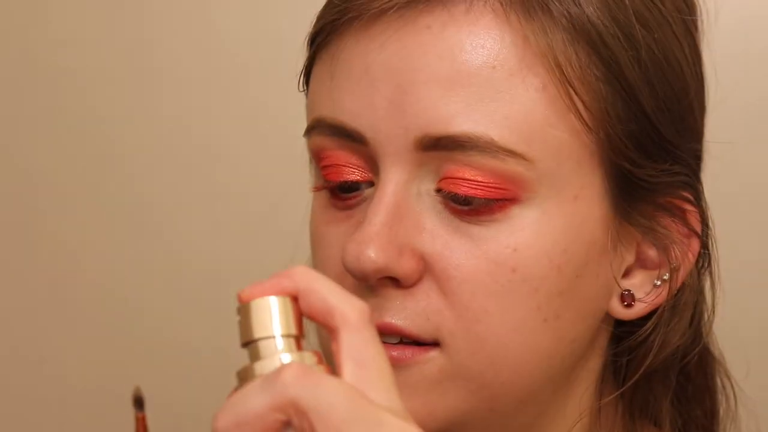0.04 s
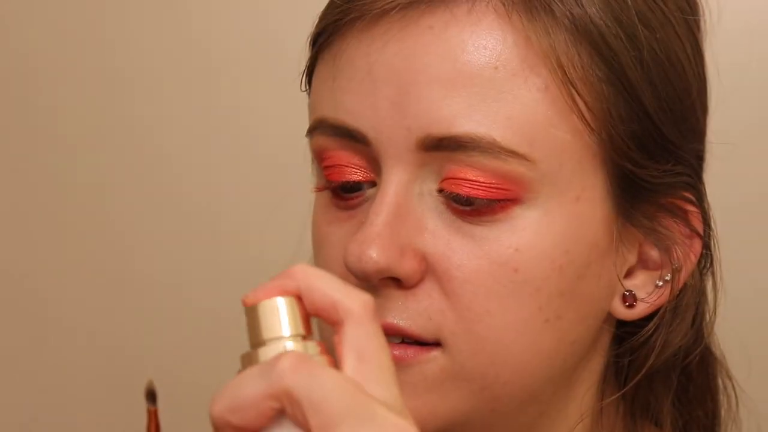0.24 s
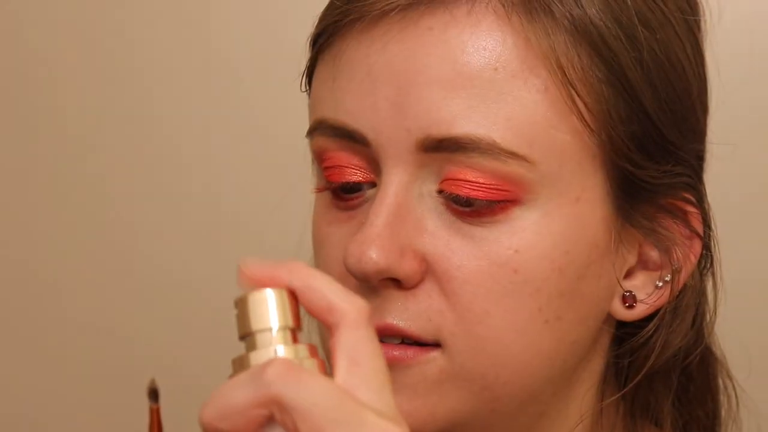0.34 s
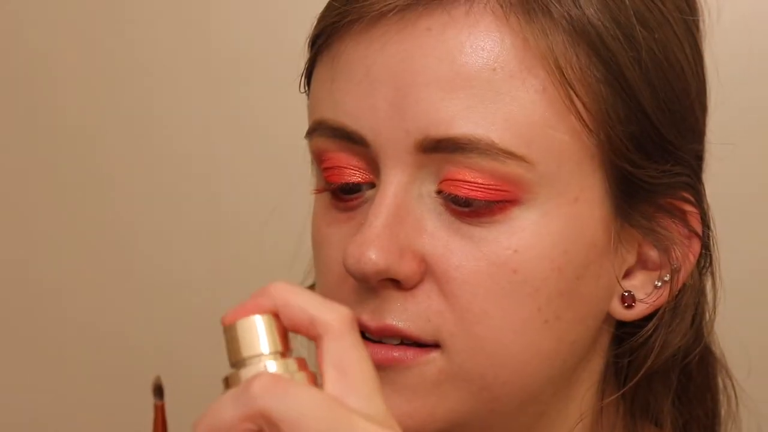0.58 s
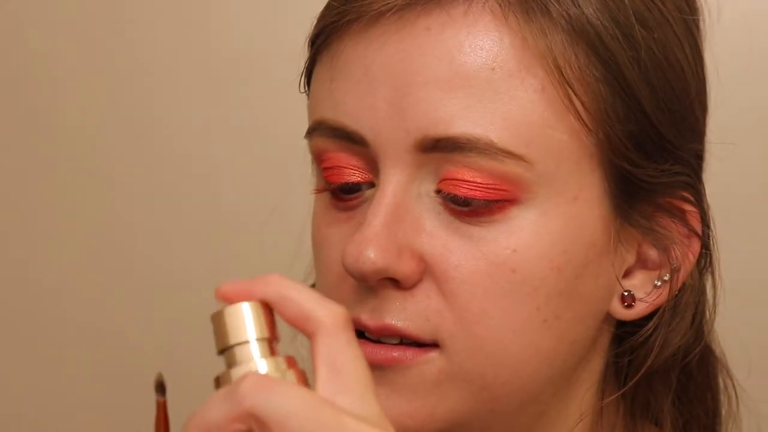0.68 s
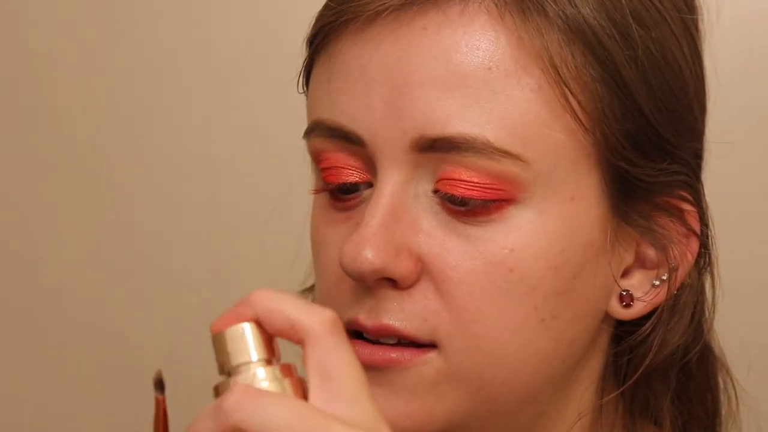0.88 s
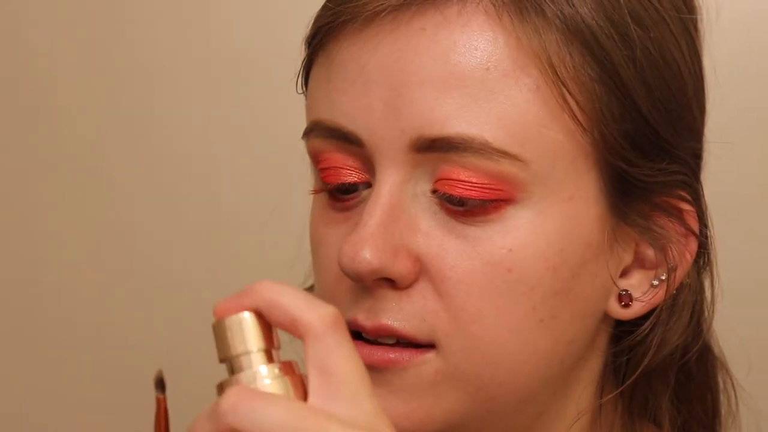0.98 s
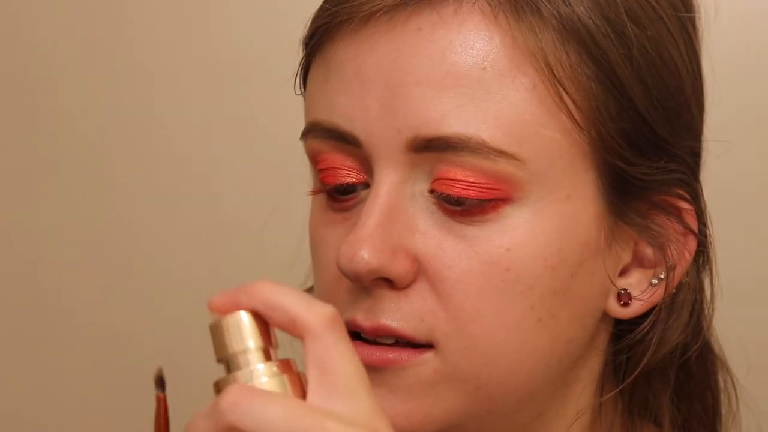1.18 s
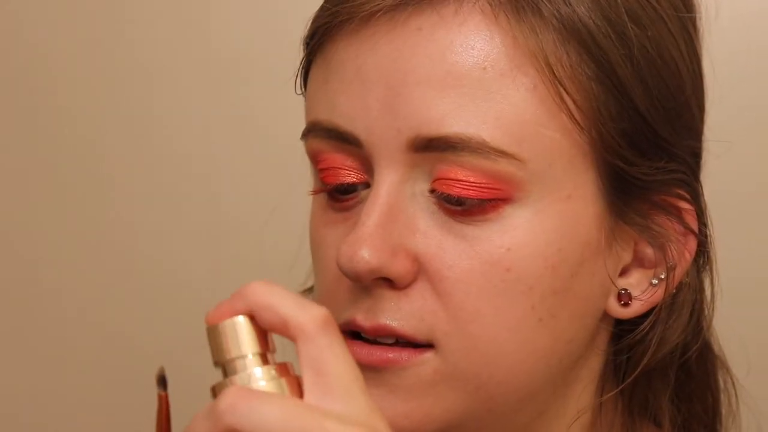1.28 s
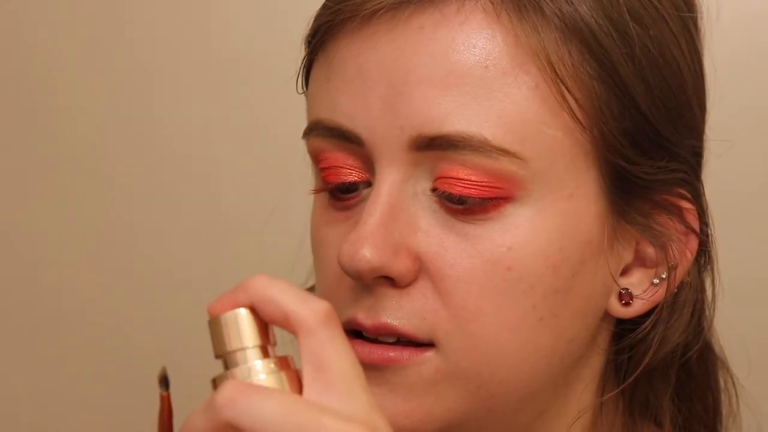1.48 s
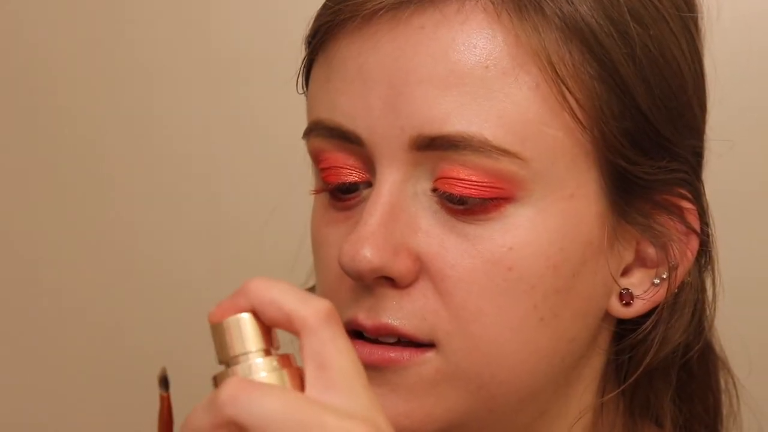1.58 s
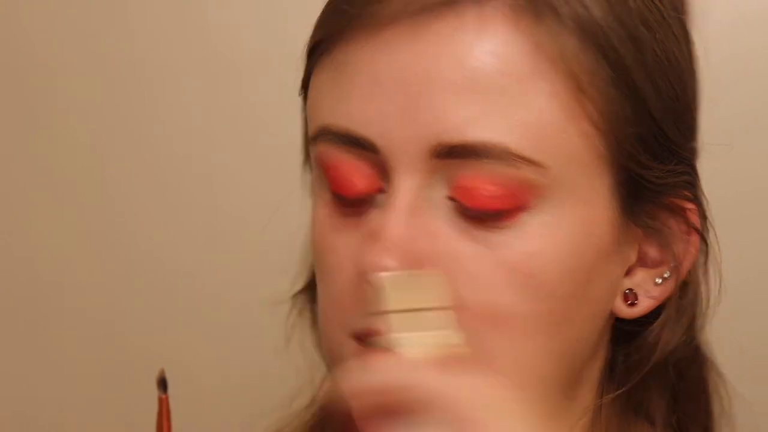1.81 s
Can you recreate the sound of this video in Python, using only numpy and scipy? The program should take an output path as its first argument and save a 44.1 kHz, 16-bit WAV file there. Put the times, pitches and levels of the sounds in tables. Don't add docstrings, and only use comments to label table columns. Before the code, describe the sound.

Six rapid pump-bottle spritzes with knocks and ticking releases, close in a small quiet room.

```python
import sys
import numpy as np
from scipy import signal
from scipy.fft import rfft, irfft
from scipy.io import wavfile

SR = 44100
rng = np.random.default_rng(int(sys.argv[2]) if len(sys.argv) > 2 else 0)


def decibels_to_gain(level_db):
    exponent = np.asarray(level_db, float) / 20
    return 10 ** exponent


def to_wav(s):
    ch = np.atleast_2d(s).T
    pcm = np.round(np.clip(ch, -1, 1) * 32767)
    wavfile.write(sys.argv[1], SR, pcm.astype(np.int16))


N = 81585


def level(x, db):
    return x * decibels_to_gain(db) / np.sqrt(np.mean(x ** 2))


def table(points, hz):
    p = np.array(points, float)
    return np.interp(np.log(np.maximum(hz, 1)), np.log(p[:, 0]), p[:, 1])


def shaped(x, gain):
    return irfft(rfft(x) * gain(np.fft.rfftfreq(len(x), 1 / SR)), len(x))


def noise(size, gain):
    return shaped(rng.standard_normal(size), gain)


def peak(hz, centre_hz, width_hz):
    return 1 / np.sqrt(1 + (2 * (hz - centre_hz) / width_hz) ** 2)


def walk(rate_hz, size):
    return level(noise(size, lambda hz: np.exp(-(hz / rate_hz) ** 2)), 0)


def decay(t, t60_s):
    return np.exp(-np.log(1000) * t / t60_s)


def lowpass(x, order, hz):
    return signal.sosfilt(signal.butter(order, hz, fs=SR, output="sos"), x)


def add(out, start_s, x):
    i = int(start_s * SR)
    out[i:i + len(x)] += x[:len(out) - i]


def gate(t, rise_s, hold_s, fall_s, sag_db_s):
    rise = np.clip(t / rise_s, 0, 1)
    fall = np.exp(-np.maximum(t - hold_s, 0) / fall_s)
    return rise * decibels_to_gain(sag_db_s * t) * fall


# pitch_hz, level_db (per Hz)
HISS = [(25, -40), (50, -7), (200, -10.5), (450, -13.5), (900, -20), (2000, -25.5), (5000, -32.5),
        (16000, -35)]
# pitch_hz, width_hz, level_db
HUM = [(121.7, 10, -52.5), (172.8, 18, -57.5), (255.5, 22.3, -65), (435, 22, -61.5)]


def background():
    t = np.arange(N) / SR
    hiss = level(noise(N, lambda hz: decibels_to_gain(table(HISS, hz)) * (hz > 30)), -50)
    hum = sum(level(noise(N, lambda hz: peak(hz, c, w) ** 2), db) for c, w, db in HUM)
    motor_hz = 44.5 + 1.62 * walk(1.75, N)
    motor = level(np.sin(2 * np.pi * np.cumsum(motor_hz) / SR), -54.5) * decibels_to_gain(1.05 * walk(8.2, N))
    linger = level(noise(N, lambda hz: peak(hz, 1450, 1300) ** 2), -60.5) * decay(t, 0.72)
    return hiss + motor + hum + linger


# pitch_hz, t60_s
ROOM_T60 = [(500, 0.25), (2000, 0.34), (6000, 0.37), (14000, 0.24)]


def room(x):
    size, level_db, gap_s = 16384, -8, 0.0034
    t, tail = np.arange(size) / SR, 0
    for hz in 250 * 2 ** np.arange(0, 6.1, .5):
        band = noise(size, lambda f: np.exp(-(np.log2(np.maximum(f, 1) / hz) * 3) ** 2))
        tail = tail + band * decay(t, table(ROOM_T60, hz))
    tail = tail * np.clip(t / gap_s - 1, 0, 1)
    tail = tail / np.sqrt(np.sum(tail ** 2))
    return decibels_to_gain(level_db) * signal.fftconvolve(x, tail)[:N]


def knock(modes, db, dark_db, rise_s, crack_db):
    size = 2048
    t = np.arange(size) / SR
    body = 0
    for hz, mode_db, t60_s in modes:
        vary_level, vary_pitch, phase = rng.standard_normal(3)
        gain = decibels_to_gain(mode_db - dark_db * np.log2(hz / 2000) + 0.27 * vary_level)
        tone = np.sin(2 * np.pi * (hz * (1 + 0.02 * vary_pitch) * t + phase))
        body = body + gain * tone * decay(t, t60_s)
    crack = lowpass(rng.standard_normal(size), 1, 7000) * np.exp(-t / 0.0024)
    x = (body / 2 + crack * decibels_to_gain(crack_db)) * (1 - np.exp(-(t / rise_s) ** 2))
    return signal.sosfilt(signal.butter(4, 610, "high", fs=SR, output="sos"), x) * decibels_to_gain(db + 13)


RATTLE_S = 0.00059


def drip(pump):
    t60_s = 0.013
    add(pump, 1.7135, knock([(2460, 0, t60_s), (3800, -5, t60_s)], -38.5, 0, RATTLE_S, -28))


# pitch_hz, width_hz, level_db
TUBE = [(996, 570, -16), (1746, 210, -15.5), (2160, 270, 0.5), (2480, 140, 0), (4230, 580, -10),
        (4900, 450, -10), (6700, 810, -15.5), (9300, 350, -13.5)]


def refill(hold_s, db):
    size = 4096
    t = np.arange(size) / SR
    liquid = 0
    for centre_hz, width_hz, band_db in TUBE:
        band = level(noise(size, lambda hz: peak(hz, centre_hz, width_hz) ** 2), 0)
        liquid = liquid + decibels_to_gain(band_db + 0.8 * walk(70, size)) * band
    air = noise(size, lambda hz: peak(hz, 3000, 3000) * hz ** 2 / (hz ** 2 + 800 ** 2))
    return level(liquid + level(air, -3.5), db) * gate(t, .0015, hold_s, 0.0071, sag_db_s=-63)


# pitch_hz, level_db, t60_s
STEM = [(981, -2.5, 0.021), (1764, -2, 0.016), (2207, -6, 0.016), (2643, -9, 0.026), (3640, -21, 0.054),
        (4240, -23.5, 0.041), (5800, -22, .02), (8960, -19.5, 0.0088), (10900, -44, 0.0057)]
# start_s, refill_length_s, refill_level_db, tick_level_db, darkness_db (per octave)
RELEASES = [
    (.5028, 0.19, -50.5, -31, -4.5),
    (0.7875, 0.042, -39.5, -27.5, -5),
    (1.0656, 0.036, -41.5, -28, -3.5),
    (1.314, 0.036, -40, -27, -3),
    (1.5488, 0.04, -42.5, -27.5, -0.3),
    (1.7604, 0.041, -53, -33.5, -3),
]


def releases(pump):
    for start_s, hold_s, db, tick_db, dark_db in RELEASES:
        x = refill(hold_s, db)
        add(x, 0, knock(STEM, tick_db, dark_db, rise_s=0.00019, crack_db=-11))
        if start_s == RELEASES[-1][0]:
            x = lowpass(x, 5, 3180)
        add(pump, start_s, x)


# pitch_hz, level_db
MIST = [(500, -35), (1100, -3), (2000, -2.5), (4000, -3), (5000, -8.5), (7000, -12), (12000, -17.5),
        (16000, -25.5)]
# pitch_hz, width_hz, gain_db
NOZZLE = [(1854, 150, -4.5), (2740, 900, 4), (4175, 410, 4), (6230, 1030, 6), (7080, 800, -3.5),
          (8560, 1150, 4.5), (10170, 970, 5.5), (13200, 540, 2.5)]


def spray(hold_s, db, dark_db, rise_s):
    size = 8192
    t = np.arange(size) / SR
    grain = rng.standard_normal(size) * decibels_to_gain(1.43 * walk(490, size))

    def colour(hz):
        fullness_db = -dark_db * np.log2(np.clip(hz, 500, 3000) / 3000)
        nozzle_db = sum(g * peak(hz, c, w) ** 2 for c, w, g in NOZZLE)
        return decibels_to_gain(table(MIST, hz) + fullness_db + nozzle_db) * hz ** 2 / (hz ** 2 + 600 ** 2)

    sputter = decibels_to_gain(0.75 * walk(90, size))
    return level(shaped(grain, colour), db) * gate(t, rise_s, hold_s, .005, sag_db_s=-22) * sputter


# pitch_hz, level_db, t60_s
HEAD = [(678, -12.5, 0.016), (945, 0.5, .014), (1180, -8.5, 0.01), (1788, 0, 0.0095), (2220, -0.5, .012),
        (3026, -3.5, 0.0081), (3760, -0.5, 0.0041), (5220, -10.5, 0.011), (6150, -14, 0.014),
        (8600, -21, 0.013), (11000, -46, .005)]
# (per octave, under 3 kHz)
PRESSES = [
    (0.2437, 0.064, -26.5, -6.5, 3.5),
    (0.5767, 0.071, -29.5, -15, 5),
    (0.8512, 0.071, -30, -17, 1),
    (1.1240, 0.054, -30.5, -27, -2.5),
    (1.3673, 0.047, -31, -34, -2),
    (1.597, 0.049, -30.5, -30, -2),
]


def presses(pump, knocks):
    for start_s, hold_s, db, knock_db, dark_db in PRESSES:
        add(knocks, start_s, knock(HEAD, knock_db, 0.7, RATTLE_S, crack_db=-15.5))
        rise_s = 0.0021 + .012 * decibels_to_gain(knock_db + 7)
        add(pump, start_s + 0.000997, spray(hold_s, db, dark_db, rise_s))
    for start_s, _, _, knock_db, _ in PRESSES[1:3]:
        add(pump, start_s - 0.001627, knock(HEAD[:6], knock_db - 9.5, 0.56, RATTLE_S, crack_db=-40))


def scene():
    pump, knocks = np.zeros(N), np.zeros(N)
    drip(pump)
    releases(pump)
    presses(pump, knocks)
    echo = room(pump + decibels_to_gain(-4) * knocks)
    return (background() + echo + pump + knocks)[None]


def band_limit(x):
    return signal.sosfilt(signal.butter(12, 16650, fs=SR, output="sos"), x)


def record(dry):
    ceiling, top_hz = .9, 15500
    clipped = np.clip(dry, -ceiling, ceiling)
    mix = signal.sosfilt(signal.ellip(7, .3, 55, top_hz, fs=SR, output="sos"), clipped)
    return band_limit(mix)


dry = scene()
out = record(dry)
to_wav(out)
```